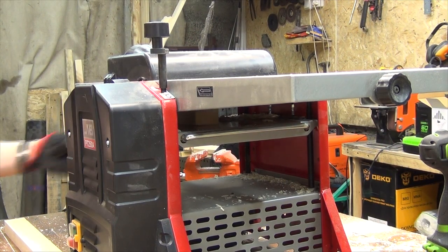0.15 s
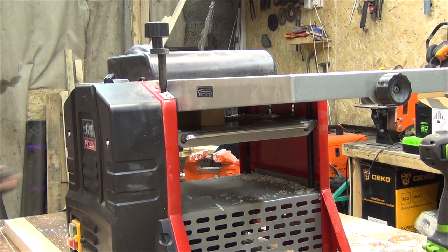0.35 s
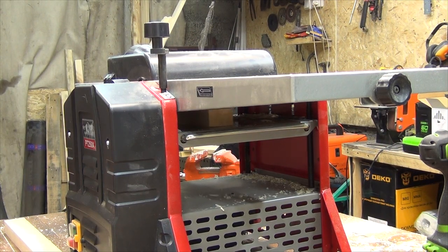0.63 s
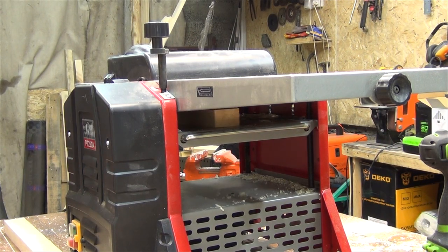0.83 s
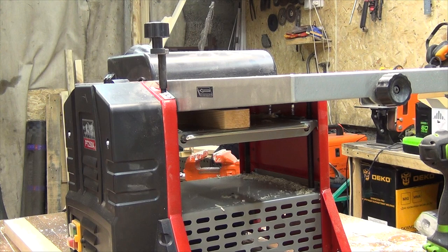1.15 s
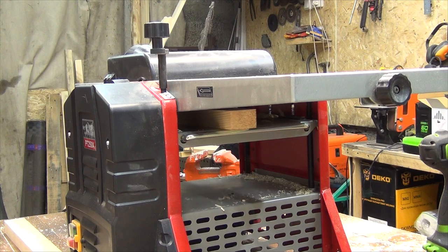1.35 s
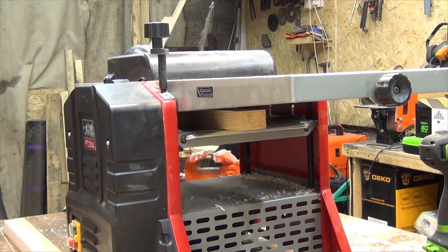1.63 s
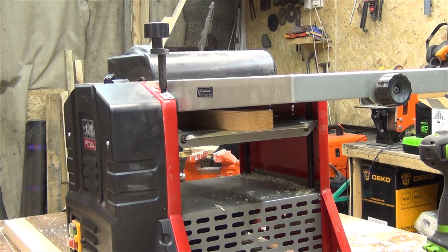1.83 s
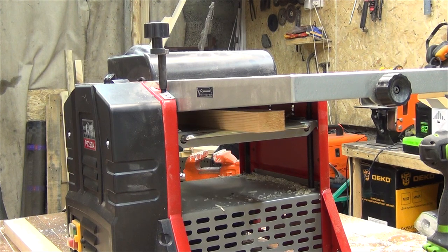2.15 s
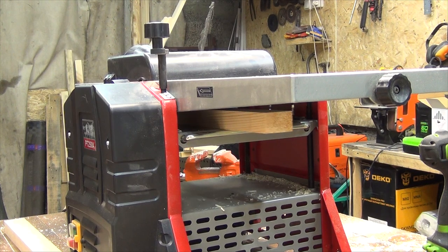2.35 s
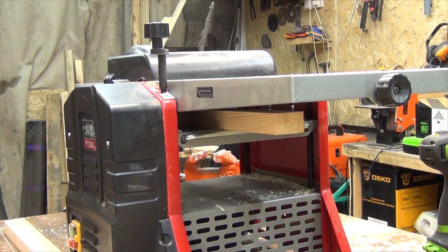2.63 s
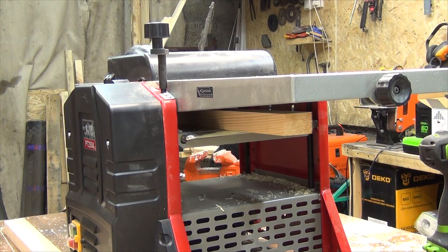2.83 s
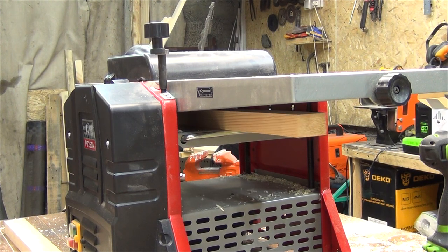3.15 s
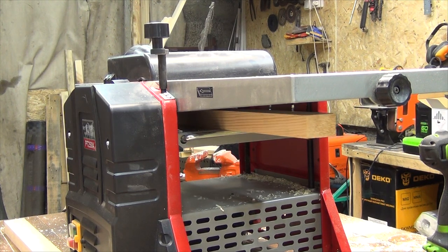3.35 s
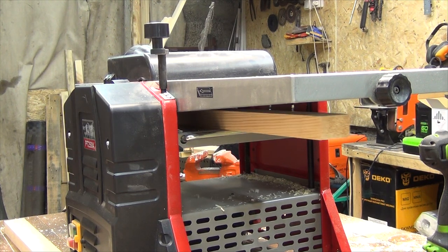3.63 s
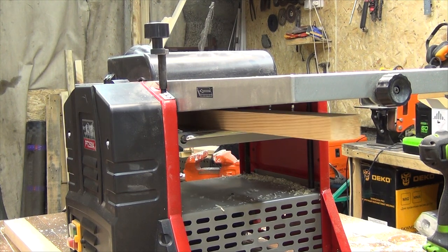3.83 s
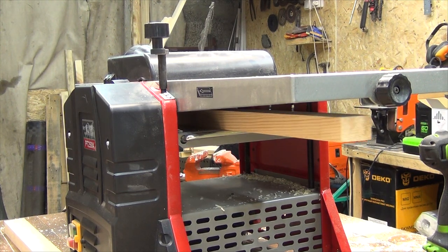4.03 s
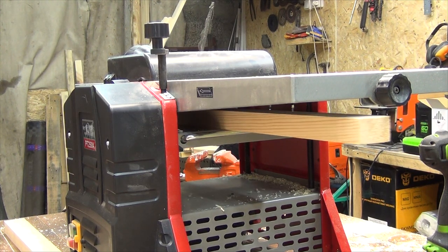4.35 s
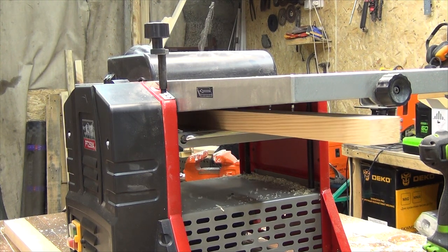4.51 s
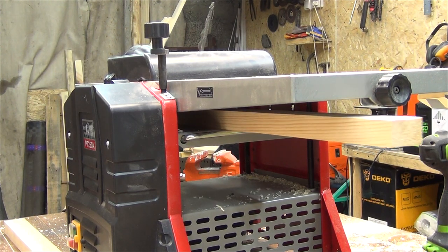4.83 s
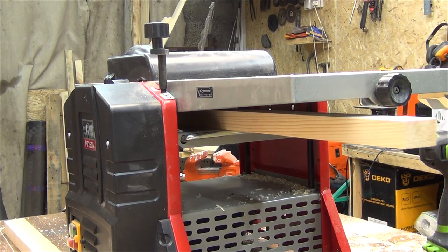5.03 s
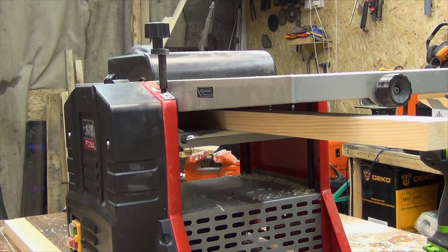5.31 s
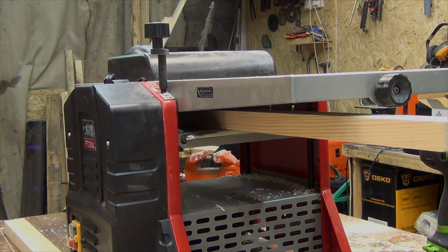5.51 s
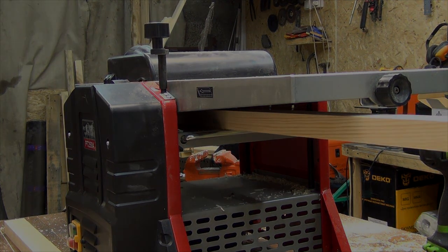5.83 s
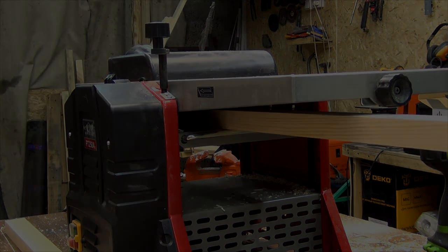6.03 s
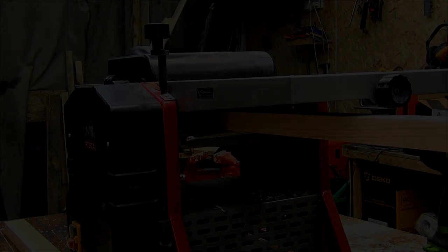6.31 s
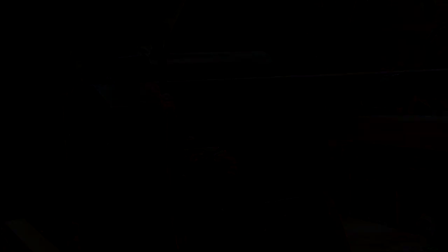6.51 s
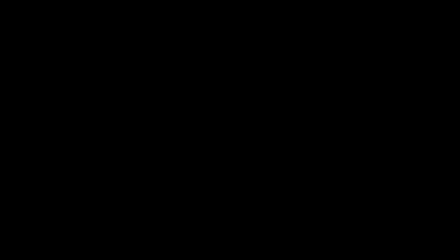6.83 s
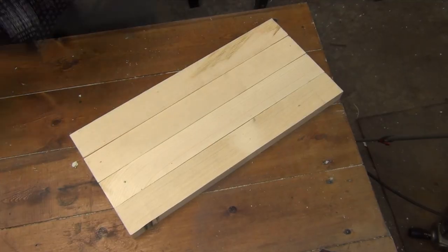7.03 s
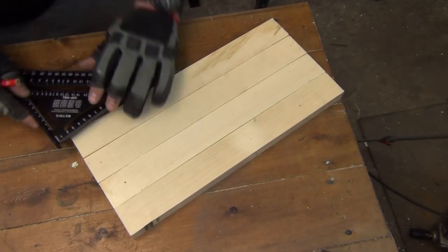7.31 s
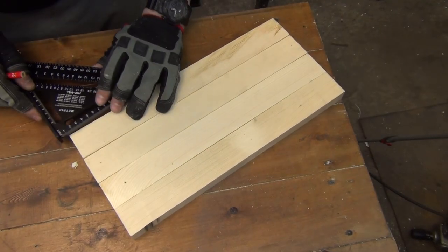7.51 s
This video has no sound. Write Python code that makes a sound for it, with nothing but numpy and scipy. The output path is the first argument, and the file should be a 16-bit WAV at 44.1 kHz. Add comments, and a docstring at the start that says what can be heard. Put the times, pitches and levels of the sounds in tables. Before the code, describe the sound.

From 0 s a thickness planer is already running at full level in a workshop, heard fairly close in stereo. Its buzzy drone, with a knife-blow pulse around 240 Hz, slides down by a couple of semitones during the first two seconds as the board loads the cutter, with a mild early rasp. Dense chip hiss, fan air and fluttering treble chatter surround it, growing slightly fuller by 1.3 s. From about 3 s thin high whines appear and fade. Around 4.8 s the pitch lifts a little; from 5.7 to 6.3 s it sags and wavers while harsh, bright rasping bites burst out, then ease. At 6.88 s everything stops dead. Much quieter air remains, with close dry scrapes and tiny squeaks of a square on wood at 6.9 to 7.05 s, fainter rubs near 7.15 s, and barely audible squeaks until the end.

```python
"""In a workshop, in stereo, a thickness planer pulls in a board: its two-knife cutter head slows under the load.
The drone sums multiples of the turn; chips and chatter are noise pulsed by the turn, beside fan hiss and rumble.
Single overtones whine, and harder bites rasp. Then the drone stops dead.
In the still air a gloved hand slides a carpenter's square over a bench: grains of rubbing and short squeaks."""
import sys
import numpy as np
from scipy import signal
from scipy.fft import rfft, irfft, next_fast_len
from scipy.io import wavfile
from scipy.ndimage import uniform_filter1d, map_coordinates

SR = 44100
rng = np.random.default_rng(int(sys.argv[2]) if len(sys.argv) > 2 else 0)


def int16_out(signal):
    """Quantize to a 16-bit WAV file."""
    q = np.round(np.clip(np.atleast_2d(signal).T, -1, 1) * 32767)
    wavfile.write(sys.argv[1], SR, q.astype(np.int16))


N = 337806
JUMP_S = 0.011  # how long a sudden shift of the board takes to change a level
THIN_DB = 2.5  # drone and chip hiss thin by this much per unit of rasp gain
SIDES = np.array([[1], [-1]])  # left, right


def undb(db):
    """Decibels to gain."""
    return 10 ** (np.asarray(db) / 20)


def level(x, db):
    """Set the rms in dB."""
    return x * undb(db) / np.sqrt(np.mean(x ** 2))


def colour(x, table, power=1):
    """Filter by (Hz, dB) points joined on a log frequency axis."""
    size = next_fast_len(N)
    hz, db = np.transpose(table)
    axis = np.maximum(np.arange(size // 2 + 1) * SR / size, 1)
    gain = undb(power * np.interp(np.log(axis), np.log(hz), db))
    return irfft(rfft(x, size) * gain, size)[..., :N]


def noise():
    """White noise as long as the scene."""
    return rng.standard_normal(N)


def walk(rate, span=slice(None)):
    """Random levels held 1 / rate s and slewed twice; spread near 1."""
    count = int(N / SR * rate) + 2
    held = np.repeat(rng.standard_normal(count), 16)
    slewed = uniform_filter1d(uniform_filter1d(held, size=16), size=16)
    return 1.3 * np.interp(np.arange(N)[span] * rate / SR, np.arange(len(slewed)) / 16, slewed)


def repeating(turns, period, renew_s, size=2048, count=160):
    """Noise that repeats every `period` turns and is slowly renewed as the knives meet new grain."""
    top = 132 * period  # spectral lines up to 132 times the turn
    keep = np.exp(-N / SR / count / renew_s)
    shape = (count + 40, top)  # 40 extra rows let the renewal settle
    seeds = rng.standard_normal(shape) + 1j * rng.standard_normal(shape)
    spectra = signal.lfilter([1], [1, -keep], seeds, axis=0)[-count:]
    waves = irfft(spectra, size, axis=1)
    waves = np.hstack([waves, waves[:, :1]])  # close the loop
    row = np.arange(N) * (count - 1) / N
    column = turns / period % 1 * size
    return level(map_coordinates(waves, [row, column], order=1), 0)


def load(t):
    """Speed of the head, settling after each change of load, and the gain of the rasp that each bite starts."""
    # Each row: start in seconds, new speed in turns per s, time constant in s,
    # rasp level in dB before its attack and decay, rasp decay in s.
    loads = [(0, 120, 0.88, -23, 1.3), (4.8, 124, 2.5, -28, 1.), (5.69, 116.3, .4, 3.5, 0.17),
             (5.82, 109, .3, 4, 0.095), (5.935, 117.2, .1, -7, .15), (6.13, 114.2, .2, 7.5, .15),
             (6.52, 118, 0.71, -33, .5)]
    start_hz, attack_s = 137.5, 0.12  # turns per s as the board enters; rise of the rasp
    ease_s, ease_db = 6.28, -3  # the rasp drops away at once as the bite eases
    speed, rasp = np.full(N, start_hz), np.zeros(N)
    for s, hz, settle_s, db, decay_s in loads:
        since = np.maximum(t - s, 0)
        before = speed[int(s * SR)]
        speed = np.where(t > s, hz + (before - hz) * np.exp(-since / settle_s), speed)
        rasp = rasp + undb(db) * (1 - np.exp(-since / attack_s)) * np.exp(-since / decay_s)
    return speed, rasp * undb(ease_db * np.clip((t - ease_s) / JUMP_S, 0, 1))


def drone(t, speed, turns):
    """Each knife blow is a downward pulse; board, housing and walls smear the phase and side of each overtone."""
    # Base levels in dB of multiples 1, 2, 3 .. of the turn; two knives favour the even ones.
    order_db = [-67, -59.5, -72.5, -57.5, -62.5, -54, -64.5, -59.5, -68.5, -57.5, -69.5, -66, -70, -64.5,
                -65.5, -64.5]
    # Peaks and dips of housing and room that the overtones slide through.
    # Each row: frequency in Hz, spread in Hz, height in dB.
    housing = [(121, 0.97, 3.5), (122.45, 0.67, -15.5), (131.6, 1.1, -7), (240.5, 2.4, 5.5),
               (257.8, 13.4, 8.5), (368, 4.2, 6), (502, 5.9, -9.5), (533.6, 28, 9), (572.7, 8.1, 8),
               (689, 7.8, 3.5), (759, 8.4, 8.5), (809, 15.5, 5.5), (867, 5.4, -7), (915, 4.4, -10),
               (986, 6.1, 7.5), (1047, 10, 4), (1130, 12.5, 9), (1225, 24.8, 9.5), (1292, 22.8, 10),
               (1353, 25.5, 7), (1610, 48, 9.5), (1693.5, 10.6, 7.5)]
    # An overtone swells or sinks as the free length of the board changes.
    # Each row: middle in seconds, spread in s, multiple of the turn, change in dB.
    swells = [(4.7, .6, 1, 4.5), (1.76, 0.23, 4, -5.5), (4.7, 0.43, 5, 3.5), (5.6, 0.1, 6, 4.5),
              (3.4, 0.41, 10, -3.5), (.5, .4, 11, -4), (5.5, 0.37, 12, 3.5), (6, 0.33, 12, 4),
              (4.06, 0.18, 14, 3), (5.26, 0.32, 14, -12), (4.4, 0.47, 13, 5), (4.7, .4, 15, 5),
              (3.4, 0.96, 16, 5.5)]
    # The board shifts under the rollers and an overtone jumps to a new level.
    # Each row: start in seconds, multiple of the turn, change in dB.
    jumps = [(5.8, 6, -3), (5.9, 8, 5), (5.92, 14, 5), (6.28, 6, 6.5), (6.28, 8, -5.5), (6.28, 14, -5.5)]
    odd_wander_db, even_wander_db = 2.5, 0.77
    # even overtones stay lined up into a pulse once the head has settled, and slip apart while it
    # runs faster; the odd ones drift freely
    lag_rad, steady_rad, odd_rad = -.8, 0.53, 2.17
    smear_rad_per_hz, settled_hz = 1.2, 121.5

    axis = np.arange(0, 2400, .1)
    housing_db = sum(db * np.exp(-.5 * ((axis - hz) / width) ** 2) for hz, width, db in housing)
    housing_db = housing_db - 0.12 * np.maximum(axis - 1940, 0)  # it passes little above 1.9 kHz
    smear_rad = smear_rad_per_hz * np.maximum(speed - settled_hz, 0)
    out = np.zeros((2, N))
    for k, db in enumerate(order_db, 1):
        wander_db = odd_wander_db if k % 2 and k > 1 else even_wander_db
        db = db + np.interp(k * speed, axis, housing_db) + wander_db * walk(2.51)
        for s, spread_s, order, gain_db in swells:
            if order == k:
                db = db + gain_db * np.exp(-.5 * ((t - s) / spread_s) ** 2)
        for s, order, jump_db in jumps:
            if order == k:
                db = db + jump_db * np.clip((t - s) / JUMP_S, 0, 1)
        gain = np.sqrt(2) * undb(db + 0.76 * walk(25))
        drift_rad = ((odd_rad if k % 2 else steady_rad) + smear_rad) * walk(0.6001)
        tone = gain * np.cos(2 * np.pi * k * turns + lag_rad + drift_rad)
        side = undb(min(0.28 * k, 1.4) * walk(1.125))
        out = out - np.array([tone * side, tone / side])  # minus: the blow points down
    return out


def whines(turns):
    """Single high overtones of the turn whine for a spell, and the multiples next to them sing along."""
    # Each row: start in seconds, end in seconds, multiple of the turn, level in dB before its wander.
    spells = [(3.05, 3.75, 18, -65), (3.1, 3.8, 55, -63), (3.4, 4.02, 36, -59.5), (3.85, 4.08, 32, -64),
              (4.45, 4.95, 37, -62), (4.42, 5.3, 34, -62.5), (4.88, 5.35, 33, -62.5), (4.9, 5.25, 55, -64),
              (5.0, 5.2, 36, -60), (5.3, 5.72, 37, -62.5), (5.8, 6.02, 40, -62), (6.12, 6.45, 33, -61),
              (6.3, 6.9, 35, -65.5), (6.38, 6.9, 64, -60), (5.92, 6.2, 70, -59)]
    neighbour_db = -10.5  # before its own wander
    out = np.zeros((2, N))
    for start, end, k, db in spells:
        on = slice(int(start * SR), int(end * SR))
        count = len(turns[on])
        swell = np.sin(np.pi * np.arange(count) / (on.stop - on.start)) ** .4
        side = undb(1.3 * rng.standard_normal() * SIDES)
        for step in (-1, 0, 1):
            beside_db = abs(step) * (neighbour_db + 3 * walk(6, on))
            gain = np.sqrt(2) * undb(db + beside_db + 1.6 * walk(25, on))
            phase = 2 * np.pi * (k + step) * turns[on] + 0.56 * walk(30, on)
            out[:, on] += side * swell * gain * np.cos(phase)
    return out


def cutting(turns, hiss_db, chatter_db, rasp_gain):
    """One knife stands prouder, so chatter and chips swell once a turn; the swells alternate a little in size."""
    # Knife chatter through the housing. Each row: frequency in Hz, density in dB per Hz.
    chatter_colour = [(1900, -30), (2100, -6), (3200, -9), (4300, -6), (5200, -15), (6300, -9), (6630, 0),
                      (6950, -7.5), (7750, -9.5), (8070, -3.5), (8400, -12), (9500, -12), (11000, -20),
                      (15500, -51)]
    # Motor fan and flying chips. Each row: frequency in Hz, density in dB per Hz.
    chip_colour = [(60, -23.5), (114, -12), (240, -5), (330, -6), (550, -0.5), (750, -3.5), (1200, -6.5),
                   (2300, -8), (2950, -12), (3500, -9.5), (5200, -12), (6400, -6.5), (7800, -1),
                   (9300, -12), (11500, -22.5), (15500, -34)]
    rasp_colour = [(1800, -28), (3600, 0), (5200, 5), (8500, 14.0), (11000, -16), (14000, -18), (15500, -17)]
    angle = 2 * np.pi * turns
    burst = undb(2.2 * np.cos(angle) + 0.65 * np.cos(angle / 2) + 0.78 * np.cos(angle / 4))
    knives = repeating(turns, period=1, renew_s=0.42) * burst
    air = noise() * burst * undb(1.0 * walk(30) + 0.86 * walk(90))
    chatter = level(colour(knives, chatter_colour), 0) * undb(chatter_db)
    rasp = level(colour(knives, rasp_colour), 0)
    # torn chips fizz in the top treble while the head rasps
    fizz = colour(air * undb(4.0 * np.cos(angle)), [(7500, -20), (9800, 3), (15500, -13)])
    rasp = (rasp + level(fizz, -9.0)) * rasp_gain
    # a treble pattern that comes round only every second turn fills in lines halfway between
    slow = repeating(turns, period=2, renew_s=0.3) * burst
    slow = colour(slow, [(4500, -55), (5800, -13), (7500, 0.5), (8500, -3.5), (10000, -36)])
    chips = level(colour(air, chip_colour), 1.0) * undb(-THIN_DB * rasp_gain)
    return undb(hiss_db) * (chatter + rasp + level(slow, -2.7) + chips)


def fan(speed):
    """The motor fan blows through the housing slots, louder while the head runs fast."""
    air = colour(noise(), [(2200, -31), (2700, -1.5), (3100, -1.5), (3800, -13.5), (5000, -27)])
    return level(air, -62.5) * undb(0.21 * (speed - 119.0) + 1.2 * walk(12))


def walls(planer, hiss_db):
    """Place the planer between left and right; reflections of the hiss reach the two sides unequally."""
    # Each row: frequency in Hz, left minus right in dB.
    lean = [(100, -1.4), (240, -2.8), (700, -1), (2400, -.3), (9000, -.3), (9800, 0)]
    echo_colour = [(60, 0), (500, -8), (2000, -11), (3000, -9.5), (5000, -5), (6500, 6.5),
                   (8200, 5.0), (9300, -19), (9700, -60)]
    echo = level(colour(noise(), echo_colour), -14) * undb(hiss_db)
    left, right = planer
    return np.array([colour(left, lean, .5) + echo, colour(right, lean, -.5) - echo])


def bench_rumble(t):
    """Low noise of the bench, independent left and right, with a slowly changing level."""
    # Each row: time in seconds, level in dB.
    rumble_db = [(0, -93), (2.5, -93), (4.5, -82), (6, -91)]
    low = colour(rng.standard_normal((2, N)), [(20, -19), (45, 0), (80, 2), (110, -48)])
    return level(low, 0) * undb(np.interp(t, *np.transpose(rumble_db)))


def square(t):
    """Dense stick-slip grains rub the wood; single resonances sing out in short spells."""
    # Colour of the rubbing. Each row: frequency in Hz, density in dB per Hz.
    rub = [(300, -12), (1200, -9), (2500, -8.5), (3800, -5.5), (4900, -12), (6500, -5), (7600, -0.5),
           (9000, -9), (10500, -20), (15500, -36)]
    # Strokes of the square over the wood. Each row: start in seconds, length in s, level in dB.
    strokes = [(6.883, .008, -71), (6.924, .04, -61), (6.974, 0.027, -60.5), (7.022, .024, -64.5),
               (7.123, .018, -76), (7.154, .014, -73), (7.185, .025, -72.5)]
    # Spells in which one resonance of square or bench sings.
    # Each row: start in seconds, length in s, frequency in Hz, width in Hz, level in dB.
    squeaks = [(6.925, 0.0056, 8500, 800, -66), (6.925, .05, 4080, 35, -64), (6.93, .026, 7500, 700, -64),
               (6.94, .012, 6850, 150, -64), (6.972, .013, 1270, 900, -67), (6.975, .03, 6350, 40, -64),
               (6.982, 0.011, 7400, 500, -59), (6.99, .008, 5540, 200, -62), (7.026, .006, 800, 900, -68),
               (7.038, .015, 1950, 400, -72), (7.185, .02, 1800, 500, -78), (7.19, .035, 6830, 40, -75),
               (7.25, .045, 6830, 40, -85), (7.4, .06, 6830, 40, -82), (7.49, .14, 3450, 150, -85),
               (7.53, .13, 3050, 150, -84)]
    stroke_rise_db_s, stroke_fall_db_s = 2598.5, 600  # dB per s
    squeak_rise_s, squeak_fall_s = .003, .006
    grains = noise() * undb(3.7 * noise())
    press = undb(-85.5)  # the glove's faint rub between strokes
    for s, length, db in strokes:
        rise_db = stroke_rise_db_s * np.maximum(s - t, 0)
        fall_db = stroke_fall_db_s * np.maximum(t - s - length, 0)
        press = press + undb(db - rise_db - fall_db)
    out = press * undb(1.4 * walk(110)) * level(colour(grains, rub), 0)
    for s, length, hz, width, db in squeaks:
        ring = signal.lfilter(*signal.iirpeak(hz, hz / width, SR), grains)
        fall = np.exp(-np.maximum(t - s - length, 0) / squeak_fall_s)
        spell = np.clip((t - s) / squeak_rise_s, 0, 1) * fall
        even_out = np.sqrt(np.sum(spell ** 2) / np.sum((ring * spell) ** 2))
        out = out + undb(db) * ring * spell * even_out
    # the bench throws a little of it to one side, 97 samples late
    thrown = colour(np.roll(out, 97), [(8000, -0.5), (10000, -25)])
    return out + undb(-15) * thrown * SIDES


def shop():
    """Still air; the deepest rumble differs left and right."""
    # Each row: frequency in Hz, density in dB per Hz.
    still_air = [(25, -6.5), (55, -14), (90, -11.5), (300, -16), (600, -20), (1050, -13.5), (1600, -24.5),
                 (3000, -27.5), (7000, -28.5), (9000, -33), (15500, -40)]
    air = level(colour(noise(), still_air), -72.5) * undb(1.3 * walk(2.17))
    rumble = level(colour(noise(), [(25, -3), (50, 6), (100, -24)]), -83.5)
    return air + rumble * SIDES


def scene():
    """Planer until the stop, then the square on the bench in the quiet shop."""
    # Each row: time in seconds, base level of the cutting hiss in dB, knife chatter against that base in dB.
    hiss = [(0, -54, -2), (1.3, -50.5, -1), (2.3, -51, -3.5), (5, -50.5, -1), (5.85, -51.5, -2.5),
            (6.4, -53, -1.5), (6.86, -54, -3)]
    stop_s, stop_fade_s = 6.876, 0.0088
    t = np.arange(N) / SR
    speed, rasp_gain = load(t)
    turns = np.cumsum(speed) / SR
    times, hiss_points, chatter_points = np.transpose(hiss)
    hiss_db = np.interp(t, times, hiss_points)
    chatter_db = np.interp(t, times, chatter_points)
    tones = (drone(t, speed, turns) + whines(turns)) * undb(-THIN_DB * rasp_gain)
    planer = tones + cutting(turns, hiss_db, chatter_db, rasp_gain) + fan(speed)
    planer = walls(planer, hiss_db) + bench_rumble(t)
    running = np.clip((stop_s - t) / stop_fade_s, 0, 1)
    return running * planer + (1 - running) * (square(t) + shop())


def record(dry):
    """The microphone channel rounds the peaks and cuts the top above 15655 Hz."""
    soft = .04 * np.tanh(dry / .04)
    return signal.sosfilt(signal.ellip(12, .2, 80, 15655, fs=SR, output="sos"), soft)


dry = scene()
out = record(dry)
int16_out(out)
```